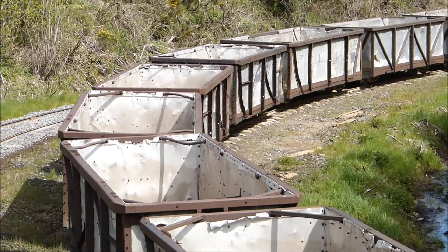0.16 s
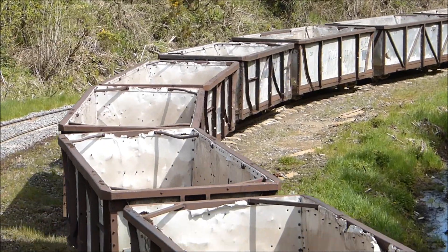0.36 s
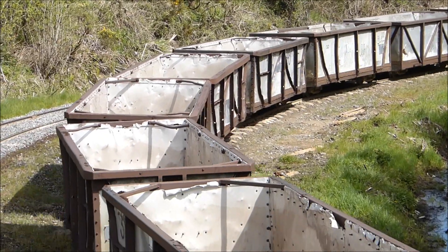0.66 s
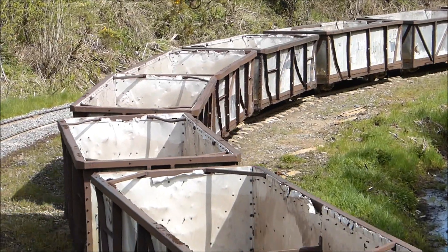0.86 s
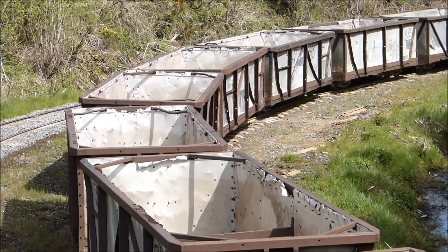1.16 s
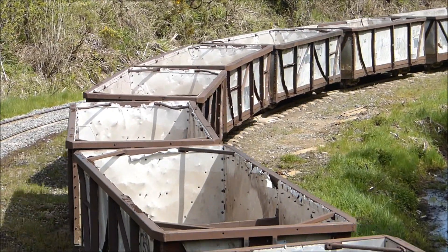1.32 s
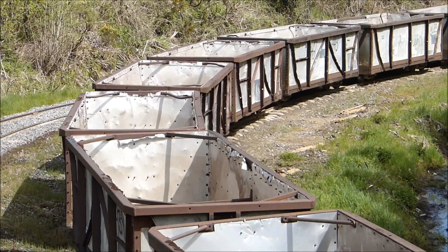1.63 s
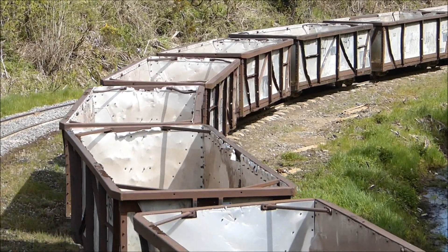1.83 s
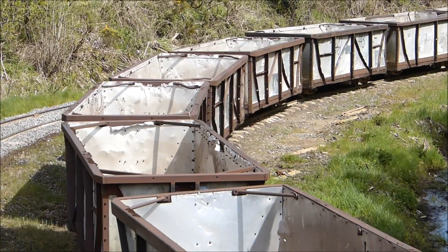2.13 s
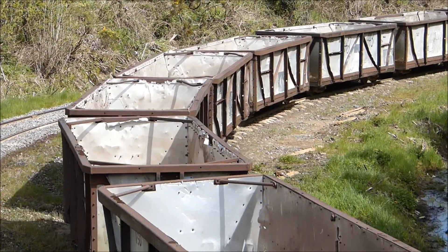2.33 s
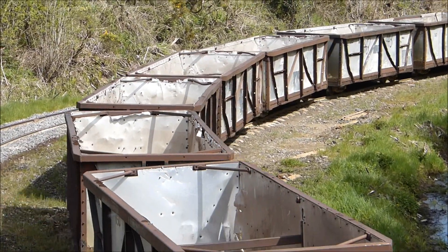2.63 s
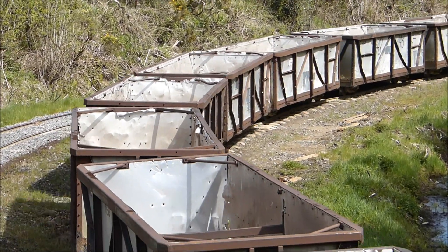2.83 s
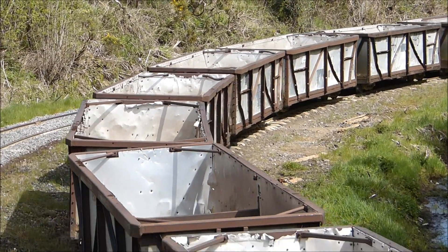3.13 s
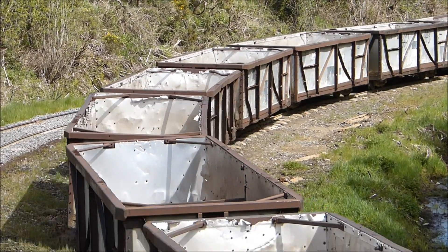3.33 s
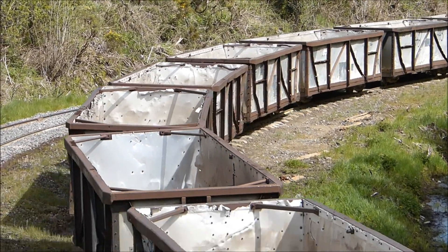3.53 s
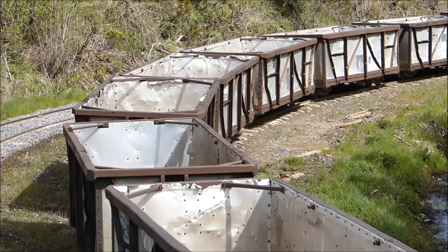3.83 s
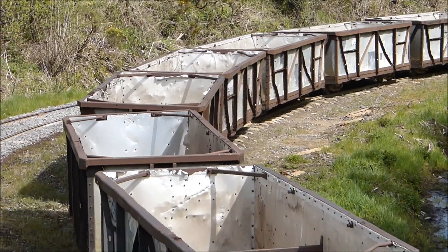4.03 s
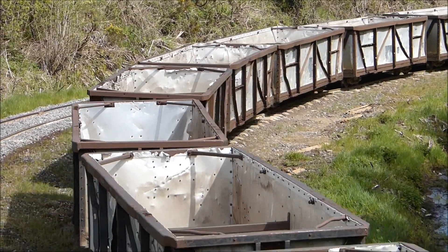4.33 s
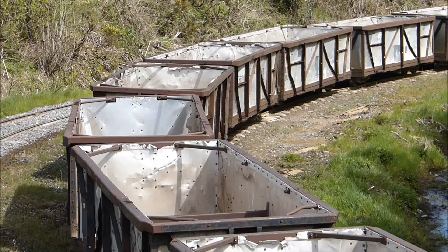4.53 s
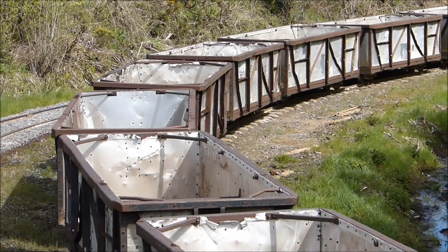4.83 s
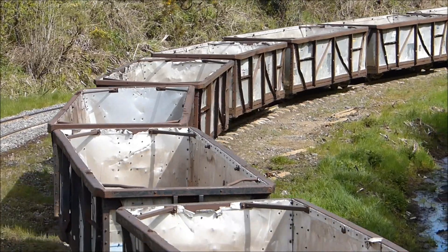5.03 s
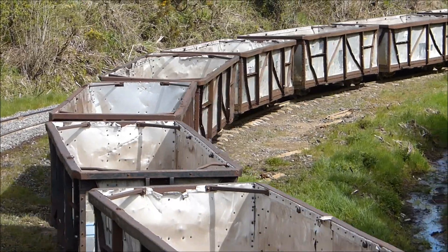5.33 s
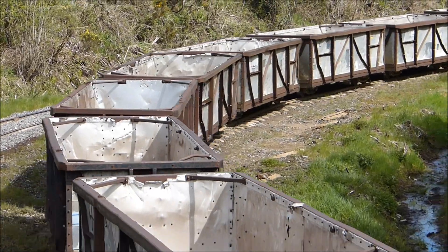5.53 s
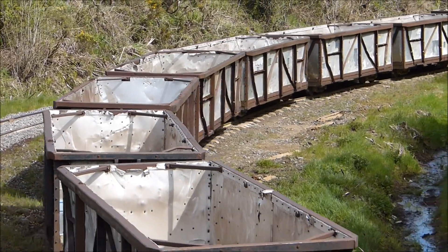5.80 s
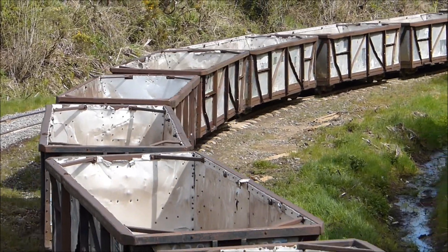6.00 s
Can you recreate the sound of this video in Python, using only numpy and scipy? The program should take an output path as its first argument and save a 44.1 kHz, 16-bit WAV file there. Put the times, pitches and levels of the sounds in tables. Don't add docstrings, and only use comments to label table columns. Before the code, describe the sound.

A close, dry open-air train pass: a hard clank first, then steady gritty rolling and tinny rattling from hollow wagons. Jolts come unevenly, each a quick cluster of metallic hits, mixed with woody-dull frame knocks. Wide, low wind buffets swell through the middle and slap the stereo microphone, then ease while the rolling returns louder, with brief resonant hums from rubbing wheels.

```python
import sys
import numpy as np
from scipy import signal
from scipy.fft import rfft, irfft
from scipy.io import wavfile
from scipy.ndimage import uniform_filter1d

SR = 44100
rng = np.random.default_rng(int(sys.argv[2]) if len(sys.argv) > 2 else 0)


def master(y):
    cut = np.clip(np.atleast_2d(y).T, -1, 1)
    pcm = np.round(cut * 32767)
    wavfile.write(sys.argv[1], SR, pcm.astype(np.int16))


def nominal_scale(level):
    x = np.asarray(level, float) / 20
    return 10 ** x


N = 271656
HZ = np.fft.rfftfreq(N, 1 / SR)
TIME = np.arange(N) / SR
LN_60_DB = np.log(1000)


def unit(x):
    return x / np.sqrt(np.mean(x ** 2))


def colour(x, points):
    hz, db = np.transpose(points)
    gain = nominal_scale(np.interp(np.log(HZ + 1), np.log(hz), db))
    return irfft(rfft(x) * gain, N)


def band(x, lo_hz, hi_hz):
    return irfft(rfft(x) / np.sqrt((1 + (lo_hz / (HZ + 1)) ** 8) * (1 + (HZ / hi_hz) ** 8)), N)


def walk(rate):
    hold = int(SR / rate)
    steps = np.repeat(rng.standard_normal(N // hold + 1), hold)
    return unit(uniform_filter1d(uniform_filter1d(steps, hold), hold)[:N])


def contacts(rate, scatter_db):
    hit = rng.random(N) < rate / SR
    return unit(hit * rng.choice([-1, 1], N) * nominal_scale(scatter_db * rng.exponential(size=N)))


def jolt(s, lasts_s, t60_s, rise_s):
    t = TIME[:int(.4 * SR)] - .03
    rise = np.minimum(t / rise_s, 0)
    settling = LN_60_DB * np.maximum(t - lasts_s, 0) / max(t60_s, .02)
    start = int(s * SR)
    return slice(start, start + len(t)), np.exp(rise - settling)


def power_of(rows):
    lead = int(0.029 * SR)
    power = np.zeros(N + SR)
    for s, db, lasts_s, t60_s, rise_s in rows:
        span, shape = jolt(s, lasts_s, t60_s, rise_s)
        power[span] += (nominal_scale(db) * shape) ** 2
    return np.sqrt(power[lead:lead + N])


def wall(t60_s, thud, count=220):
    t = TIME[:2048]
    chance = rng.random((count, 3))
    hz = 350 + 10400 * chance[:, :1]
    decay = LN_60_DB / t60_s * (.5 + chance[:, 1:2]) * (hz / 2000) ** 0.84
    modes = np.sqrt(decay) * np.exp(-decay * t) * np.sin(2 * np.pi * (hz * t + chance[:, 2:]))
    ring = np.sum(modes, 0)
    ring = ring / np.sqrt(np.sum(ring ** 2))
    ring[0] = thud
    return ring


def sheet(x, walls, size=1024):
    out = np.zeros(N + 4 * size)
    for start in range(0, N, size):
        rung = signal.fftconvolve(x[start:start + size], walls[rng.integers(len(walls))])
        out[start:start + len(rung)] += rung
    return unit(out[:N])


# pitch_hz, width_hz, lift_db
PORT_MODES = [
    (1110, 270, 1.5),
    (2245, 620, 12),
    (2984, 400, 5),
    (3560, 1300, 8),
    (4766, 360, 6.5),
    (7000, 250, 3.5),
]
SPLIT_HZ = (650, 1800, 5200)


def port(x, points, lifted):
    lift_db = sum(lifted * db / (1 + (2 * (HZ - hz) / width) ** 2) for hz, width, db in PORT_MODES)
    x = irfft(rfft(colour(x, points)) * nominal_scale(lift_db), N)
    lows = [irfft(rfft(x) / (1 + (HZ / hz) ** 6), N) for hz in SPLIT_HZ]
    return [unit(hi - lo) for lo, hi in zip([0] + lows, lows + [x])]


# time_s, rolling_db, fittings_looseness_db, rail_roughness_db
ROLL = [(0.0, -28, -4, -3), (0.12, -29.5, -2, 4), (1.06, -30, 0, -0.5), (1.41, -31.5, 2.5, 1.5),
        (1.59, -36.5, 1.5, 1), (1.82, -35.5, 4, -2.5), (2.23, -33.5, 3, 1), (3.0, -34.5, 1, 1),
        (3.29, -36.5, 0.5, 0.5), (3.71, -40, 3.5, -1), (3.94, -34.5, -0.5, -1), (4.13, -31, -3.5, -1.5),
        (4.44, -28.5, -0.5, 3.5), (4.94, -29, -3, -1.5), (5.32, -32.5, 0, 1), (6.16, -28.5, -0.5, 0)]
# start_s, level_db
BOOMS = [
    (.005, -30),
    (.46, -35),
    (1.58, -51),
    (2.9, -39),
    (3.52, -35),
    (4.07, -33.5),
    (4.38, -47),
    (4.8, -35.5),
    (6.0, -36),
]
# pitch_hz, level_db
FRONT = [(13, -16), (22, -26), (55, -24.5), (156, -5.5), (343, 1), (665, -5), (1110, 1.5), (1750, -10.5),
         (2250, -17.5), (2620, -17.5), (3470, -10.5), (4480, -19.5), (7080, -14.5), (8450, -20.5),
         (9600, -29), (12500, -118), (21100, -120)]
# pitch_hz, level_db
ACROSS = [(13, -34), (22, -20), (44, -21), (296, -1), (563, -5.5), (640, -8.5), (747, -5), (1250, -2.5),
          (2770, -10.5), (8380, -14.5), (10300, -32.5), (13400, -58), (22000, -120)]
# pitch_hz, level_db
STRUCK = [(290, -38), (500, -10), (598, 12), (724, 3.5), (1270, 9), (1640, 2.5), (2200, -13.5),
          (3620, -8.5), (4220, -11), (4450, -20), (5520, -16), (7220, -6), (10600, -30.5), (13800, -115),
          (22000, -120)]


def train(walls, rolling, struck, lifted, tilt_db):
    s, *columns = np.transpose(ROLL)
    roll_db, loose_db, rough_db = (np.interp(TIME, s, c) for c in columns)
    rumble_db = -40 + 0.27 * (roll_db + 32) + rough_db
    rumble, drone, rattle, shrill = port(sheet(contacts(12000, 1.4), walls), rolling, lifted)
    _, shudder, clank, clink = port(sheet(contacts(3500, 1.8), walls), struck, lifted)
    shake_db = 1.64 * walk(25.05)
    rattle_db = roll_db - 7.5 + loose_db + shake_db
    shrill_db = roll_db - 15.5 + 1.2 * loose_db + shake_db

    clanks, clinks = [], []
    shakes = [(s, db - 15.5, KNOCK_LASTS_S, .12, .001) for s, db, _ in KNOCKS]
    for s, db, shrill_part_db, lasts_s, blow_db, t60_s, _ in jolts():
        rise_s = .002 * nominal_scale(-blow_db)
        clanks.append((s, db - 13.5, lasts_s, t60_s, rise_s))
        clinks.append((s, db + shrill_part_db - 7.5, 0.69 * lasts_s, 1.28 * t60_s, rise_s))
        shakes.append((s, db - 18.5, lasts_s, t60_s, rise_s))
    boom_gain = power_of([(s, db, 0.015, 0.44, .006) for s, db in BOOMS])

    ranges = (rumble * np.hypot(nominal_scale(rumble_db + 1.2 * walk(7)), boom_gain),
              drone * nominal_scale(roll_db + 0.2 * walk(12)) + shudder * power_of(shakes),
              rattle * nominal_scale(rattle_db) + clank * power_of(clanks),
              shrill * nominal_scale(shrill_db) + clink * power_of(clinks))
    return sum(nominal_scale(db) * r for db, r in zip(tilt_db, ranges))


# start_s, peak_db, shrill_part_db (re peak), bouncing_s, first_blow_db
END_JOLTS = [(0.532, -13.5, -14.5, 0.02, -2), (.609, -16, -13.5, 0.026, -1.5), (.9975, -15, -6, 0.0055, 3),
             (1.492, -18.5, -16, 0.027, 4), (1.621, -14, -11, .0065, -6), (1.905, -21, -11.5, 0.044, 6),
             (2.186, -20, -8, .022, -3), (2.687, -25, -38, 0.043, -5), (2.791, -16.5, -12.5, 0.025, 1.5),
             (2.872, -20, -12.5, 0.028, 0), (3.058, -22.5, -14.5, 0.04, -2), (3.174, -16, -8.5, 0.0065, 0),
             (3.472, -25.5, -17, 0.029, -8), (3.94, -16, -12.5, 0.018, -13), (4.113, -16, -7, 0.019, 4.5),
             (4.237, -24, -27, 0.018, 6), (4.347, -15, -12.5, 0.01, -6), (4.716, -13.5, -7.5, 0.02, 1.5),
             (5.272, -18, -10.5, 0.027, -13.5), (5.728, -22, -12, .036, 1), (5.878, -12.5, -11, 0.021, -1),
             (5.966, -14, -14, .03, -13), (6.078, -11.5, -11, 0.004, -1)]
# start_s, peak_db, shrill_part_db (re peak), bouncing_s
SIDE_JOLTS = [(0.0322, -10, -11.5, 0.017), (.12, -21.5, -15, 0.077), (0.3336, -15.5, -21, 0.046),
              (.51, -20, -17, 0.08), (0.81, -17, -10.5, 0.031), (1.16, -20.5, -19, 0.005),
              (1.2333, -17.5, -7, 0.021), (1.31, -21, -19, 0.01), (1.434, -17, -12.5, 0.026),
              (1.7863, -25, -17, 0.02), (2.111, -26.5, -19, 0.034), (2.33, -23.5, -17, 0.044),
              (2.378, -17, -15.5, 0.022), (2.54, -25, -18, .025), (2.5658, -14.5, -9, 0.0043),
              (2.995, -27, -22, 0.044), (3.728, -20.5, -10.5, 0.026), (4.068, -22, -19, 0.016),
              (4.4294, -25, -13, 0.039), (4.5286, -15.5, -11, 0.028), (4.542, -22, -12.5, 0.031),
              (4.811, -23.5, -9.5, .04), (4.993, -29, -30, 0.035), (5.1794, -25, -14, 0.029),
              (5.466, -18, -11.5, 0.025), (5.647, -16, -10.5, 0.02), (6.013, -21, -17, .03),
              (6.142, -20.5, -11, .018)]


def jolts():
    rows = [(*row, 3470) for row in END_JOLTS]
    rows += [(*row, -4, 2980) for row in SIDE_JOLTS]
    return [(s, db, shrill_db, lasts_s, blow_db, 0.13 + 3.1 * lasts_s, hz)
            for s, db, shrill_db, lasts_s, blow_db, hz in rows]


def blows(walls):
    out, panels, t = np.zeros(N + SR), np.zeros(N + SR), TIME[:2048]
    rows = jolts()
    for (s, db, _, _, blow_db, _, hz), chance in zip(rows, rng.random((len(rows), 4))):
        ring = walls[int(chance[0] * len(walls))] * nominal_scale(db + blow_db)
        panel_hz = hz * (1 + 0.018 * (2 * chance[3] - 1))
        panel = nominal_scale(db - 14.5) * np.exp(-LN_60_DB * t / 0.057) * np.sin(2 * np.pi * panel_hz * t)
        rebound = (0.0017 + 0.013 * chance[1], chance[2] - 1)
        for late_s, size in ((.002, 1), rebound):
            start = int((s + late_s) * SR)
            out[start:start + len(t)] += size * ring
            panels[start:start + len(t)] += size * panel
    click = band(colour(np.eye(1, N)[0], STRUCK), 900, 11000)
    return nominal_scale(-8.5) * band(colour(out[:N], STRUCK), 820, 10000) / click.max() + panels[:N]


# start_s, peak_db, pitch_hz
KNOCKS = [(0.028, -15.5, 1280), (.32, -17, 980), (0.371, -30, 970), (.517, -13.5, 1103),
          (0.561, -19.5, 1110), (0.613, -18.5, 1340), (0.75, -18, 1115), (4.805, -15, 1330),
          (0.997, -29, 1030), (1.236, -19.5, 1440), (1.437, -19, 1335), (1.922, -16.5, 1130),
          (2.095, -16, 1194), (2.188, -16.5, 1300), (2.412, -18.5, 1195), (2.531, -14.5, 1300),
          (2.711, -17, 1290), (2.789, -18, 1270), (3.173, -18.5, 1230), (3.465, -23, 944),
          (4.069, -15, 1270), (4.115, -27, 1110), (4.711, -25, 880), (2.443, -21.5, 1114),
          (5.009, -17, 917), (5.08, -17.5, 890), (5.192, -17.5, 1110), (5.466, -19.5, 1080),
          (5.883, -19, 1230), (5.954, -18, 940)]
KNOCK_LASTS_S = .019


def knocks():
    out, t = np.zeros(N + SR), TIME[:1500]
    for (s, db, hz), chance in zip(KNOCKS, rng.random((len(KNOCKS), 4))):
        ring = nominal_scale(db - 3) * np.exp(-LN_60_DB * t / .04) * np.sin(2 * np.pi * hz * t)
        first_rebound = (.4 + .2 * chance[0], .6 + .4 * chance[1])
        last_rebound = (1, .4 + .4 * chance[2])
        for late, size in ((0, 1), first_rebound, last_rebound):
            start = int((s + late * KNOCK_LASTS_S) * SR)
            out[start:start + len(t)] += size * ring
    return out[:N]


# start_s, end_s, pitch_hz, width_hz, level_db
HUMS = [
    (5.02, 5.11, 2150, 60, -41),
    (5.23, 5.36, 2170, 70, -40),
    (4.8, 4.96, 3020, 110, -44),
    (5.46, 5.59, 2910, 50, -43),
    (5.65, 5.74, 2200, 80, -45),
    (5.7, 5.9, 3200, 120, -41),
    (4.74, 4.84, 2320, 80, -45),
    (2.98, 3.04, 2940, 60, -42),
    (6.04, 6.1, 3800, 90, -41),
    (.0, .3, 2250, 120, -46),
]


def hums():
    rub, out = rfft(contacts(3600, 1.4)), 0
    for start, end, hz, width, db in HUMS:
        swell = np.sin(np.pi * np.clip((TIME - start) / (end - start), 0, 1)) ** .5
        hum = unit(irfft(rub / (1 + (2 * (HZ - hz) / width) ** 2), N))
        out = out + nominal_scale(db + 2.9 * walk(24)) * swell * hum
    return out


# middle_s, level_db, blowing_s
GUSTS = [(.36, -31.5, 0.046), (.62, -30, 0.21), (.9, -22.5, .08), (1.09, -25.5, .03), (1.27, -23, 0.1),
         (1.42, -19.5, 0.02), (1.6, -17, 0.07), (1.8, -20.5, 0.13), (2.07, -21.5, 0.07), (2.35, -18.5, .03),
         (2.57, -22, 0.19), (2.87, -17.5, .13), (3.06, -22, .03), (3.19, -17.5, 0.036), (3.33, -19, 0.13),
         (3.58, -17, 0.23), (3.78, -20.5, 0.028), (3.97, -39, .03), (4.21, -36, 0.027), (4.31, -30, 0.025),
         (4.55, -42, .2), (4.74, -30.5, 0.026), (4.95, -21, 0.041), (5.08, -27, 0.11), (5.29, -22, 0.036),
         (5.52, -30, .08), (5.84, -24, 0.024), (6.09, -22, 0.038)]


def gust_level():
    rise_db_s, fall_db_s, calm_db = 218, 163, -42.5
    s, db, blows_s = np.transpose(GUSTS)[:, :, None]
    t = TIME[::64]
    early = np.maximum(s - blows_s / 2 - t, 0)
    late = np.maximum(t - s - blows_s / 2, 0)
    power = nominal_scale(2 * (db - rise_db_s * early - fall_db_s * late)).sum(0) + nominal_scale(2 * calm_db)
    return np.interp(TIME, t, 10 * np.log10(power))


# start_s, peak_db
SLAPS = [(1.079, -17.0), (1.306, -17.0), (1.749, -13.0), (1.933, -19.0), (2.004, -20.0), (2.109, -17.0),
         (2.156, -20.0), (2.354, -9.0), (2.481, -19.0), (2.522, -13.0), (2.628, -18.0), (3.302, -10.0),
         (3.386, -12.0), (3.464, -11.0), (3.526, -11.0), (3.643, -5.0), (3.695, -12.0), (3.764, -12.0),
         (3.785, -13.0), (4.925, -13.0), (5.006, -16.0), (5.032, -18.0), (5.235, -19.0)]
# pitch_hz, level_db
BUFFET = [(18, -82), (30, -48), (59, -26.5), (158, 3), (262, 5.5), (332, 1), (462, -1.5), (831, -12.5),
          (1300, -22.5), (1680, -27), (3200, -53), (4160, -81), (7040, -120)]


def wind():
    gust_db = gust_level()
    eddies = unit(colour(contacts(1200, 1.5), BUFFET)) * nominal_scale(2.2 * walk(35))
    slaps = np.zeros(N)
    for s, db in SLAPS:
        slaps[int(s * SR)] = nominal_scale(db - 1.5)
    click = colour(np.eye(1, N)[0], BUFFET)
    own = np.sqrt(np.maximum(1 - nominal_scale(2 * (-40 - gust_db)), .01))
    blown = unit(eddies) * nominal_scale(gust_db - 3.7) * own + colour(slaps, BUFFET) / click.max()
    return band(.55 * np.tanh(blown / .55), 45, 5000)


def scene():
    walls = [wall(0.072, 2.84) for _ in range(12)]
    mid = train(walls, FRONT, STRUCK, 0.96, (0.042, 0.058, 0.051, 0.085))
    mid = mid + knocks() + blows(walls) + hums()
    side = train(walls, ACROSS, ACROSS, 0, (-4.0, -12.5, -8.5, -8.5)) + wind()
    side = side + 0.13 * band(mid, 700, 1600) - 0.086 * band(mid, 1700, 3000)
    deep = unit(band(colour(rng.standard_normal(N), BUFFET), 40, 153))
    mid = mid + nominal_scale(.5 * gust_level() - 36.5) * deep
    return np.array([mid + side, mid - side])


def band_limit(x):
    return signal.sosfilt(signal.butter(12, 10750, fs=SR, output="sos"), x)


def record(dry):
    mix = dry - .0032
    return band_limit(mix)


dry = scene()
out = record(dry)
master(out)
```